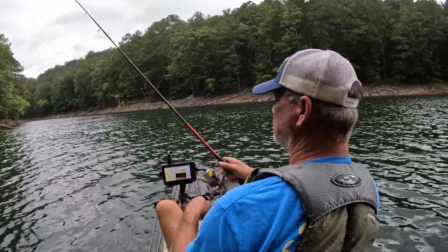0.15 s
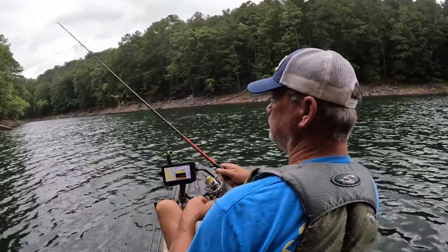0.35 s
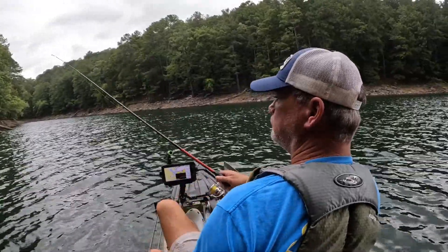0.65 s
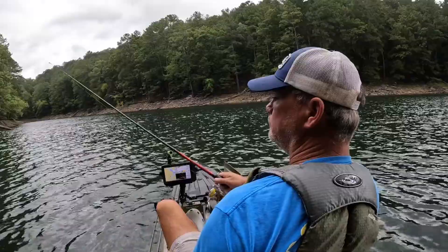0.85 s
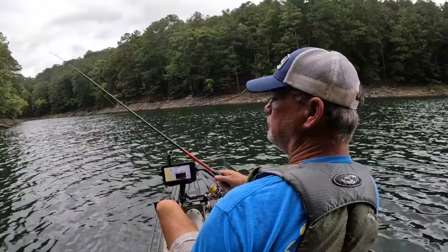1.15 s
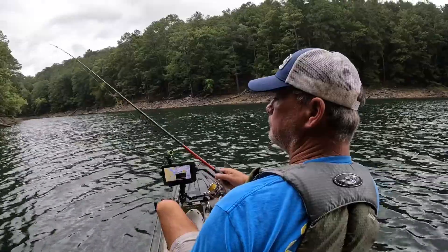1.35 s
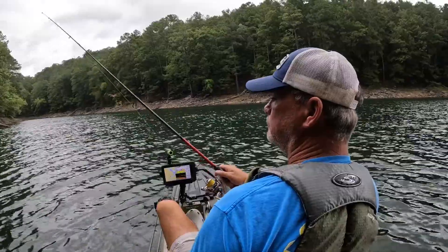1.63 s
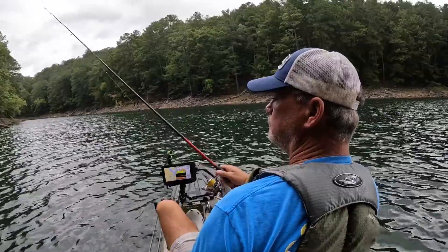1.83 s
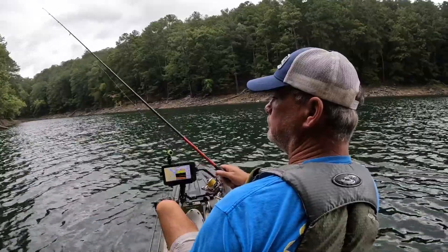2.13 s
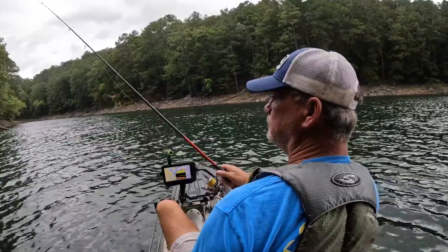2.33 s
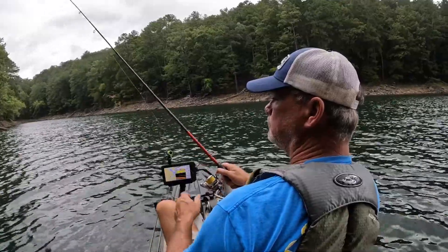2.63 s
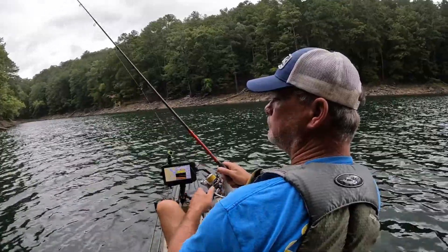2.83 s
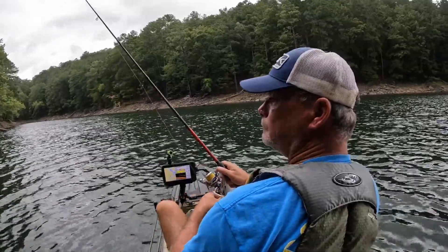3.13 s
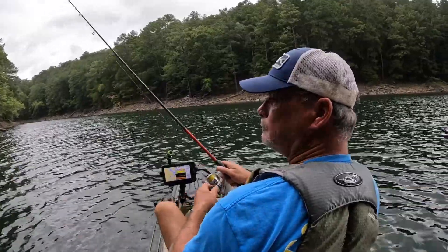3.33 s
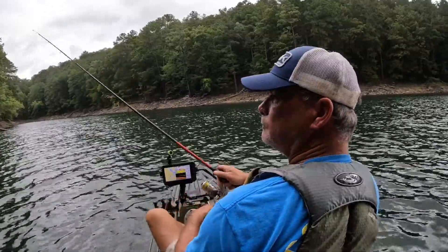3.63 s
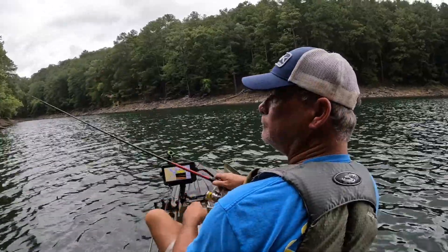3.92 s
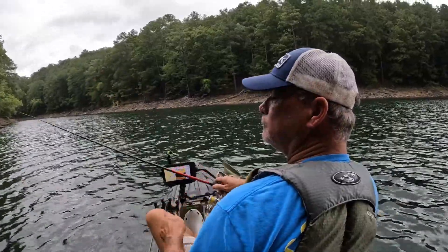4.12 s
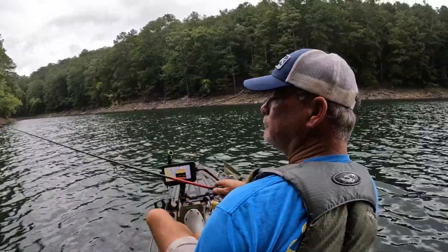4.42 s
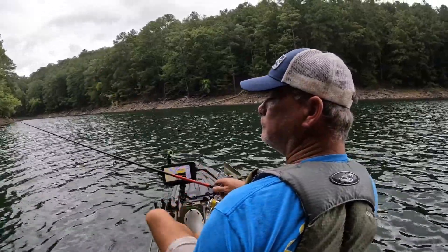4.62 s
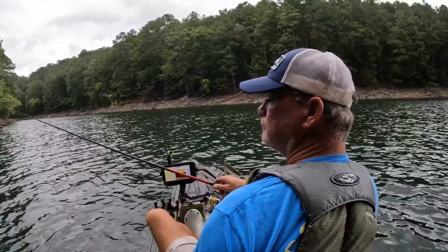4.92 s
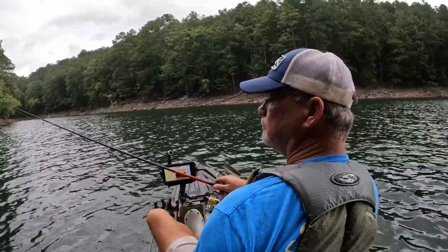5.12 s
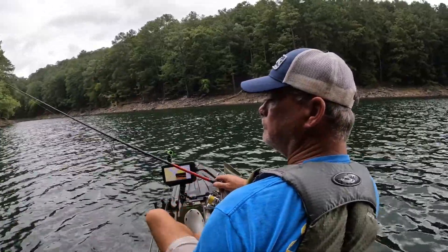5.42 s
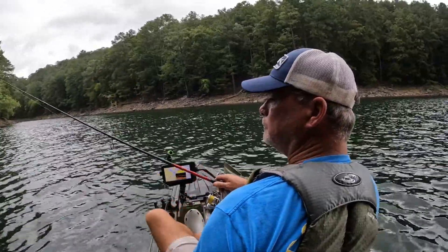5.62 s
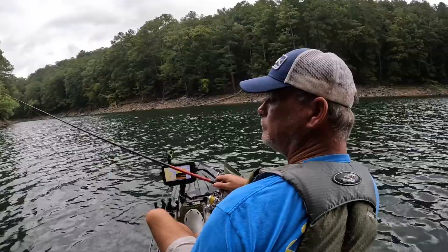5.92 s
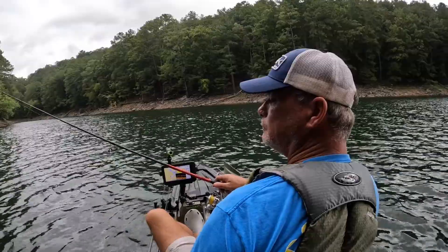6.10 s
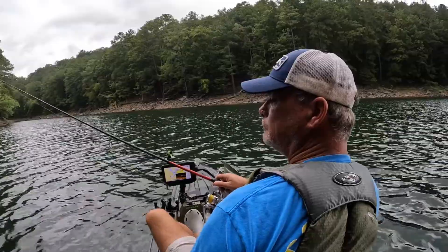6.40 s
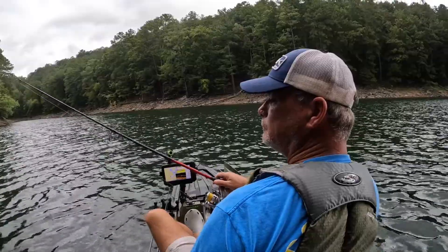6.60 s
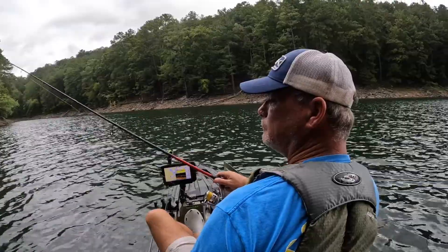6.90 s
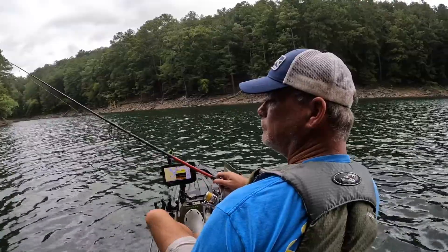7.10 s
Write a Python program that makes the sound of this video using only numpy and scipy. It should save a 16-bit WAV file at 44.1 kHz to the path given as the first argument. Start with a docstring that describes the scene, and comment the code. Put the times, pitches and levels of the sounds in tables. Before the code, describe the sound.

Low buffeting wind, soft watery wash and bubbly laps against a small boat, scattered tackle ticks and a few dull hull knocks.

```python
"""On a breezy lake, an angler sits in a small boat while gusts buffet the microphone as turbulent noise.
Ripples wash and slosh as filtered noise; bubbles plop along the hull as decaying sines of rising pitch.
The hull knocks as a sum of damped modes; rod and reel tick as resonant noise bursts.
The line squeaks as gliding sines, a sleeve rustles as noise shaped by the stroke's speed,
and the left microphone port rings in the treble."""
import sys
import numpy as np
from scipy import signal
from scipy.fft import rfft, irfft, next_fast_len
from scipy.io import wavfile
from scipy.ndimage import uniform_filter1d, map_coordinates

SR = 44100
rng = np.random.default_rng(int(sys.argv[2]) if len(sys.argv) > 2 else 0)


def persist_wave(psi):
    """Save psi, clipped to +-1, as 16-bit WAV."""
    counts = np.round(np.clip(psi, -1, 1) * 32767).astype(np.int16)
    wavfile.write(sys.argv[1], SR, np.atleast_2d(counts).T)


N = 319813  # samples

# Gusts on the microphone. Each row: start of full strength in seconds, hold in seconds,
# rumble in dB, flutter in dB, both before trims.
GUSTS = [(-0.02, .03, -24.5, -31.5), (0.195, .14, -26, -30.5), (.5, 0.073, -33.5, -33),
         (0.605, 0.3, -29, -39), (1.023, 0.17, -32.5, -44), (1.313, 0.035, -32, -48),
         (1.47, 0.057, -32.5, -50), (1.72, 0.31, -36, -57), (2.268, 0.078, -33.5, -48),
         (2.436, 0.044, -24, -39), (2.524, 0.33, -30, -44.5), (3.078, 0.32, -33, -46),
         (3.583, 0.085, -42, -48.5), (4.024, .07, -37, -61), (4.155, 0.35, -35, -48),
         (4.604, 0.14, -43.5, -48.5), (5.044, 0.17, -43.5, -61), (5.332, 0.37, -39, -44),
         (5.82, 0.051, -31.5, -46.5), (6.19, 0.5, -45.5, -53.5), (6.811, 0.14, -31, -37.5),
         (7.04, .02, -39, -32.5), (7.142, .1, -35.5, -42.5)]
# Large eddies. Each row: frequency in Hz, relative spectral level in dB.
RUMBLE_SPECTRUM = [(8, -32), (18, -2.5), (30, 5.5), (48, 0), (58, -9.5), (75, -17), (110, -59), (300, -100)]
# Smaller eddies. Each row: frequency in Hz, relative spectral level in dB.
FLUTTER_SPECTRUM = [(35, -24), (52, 0), (66, 0.5), (82, -3.5), (100, -13.5), (125, -14.5), (170, -32.5),
                    (260, -41.5), (600, -70)]
# Quick eddies of a hard gust. Each row: frequency in Hz, relative spectral level in dB.
BUFFET_SPECTRUM = [(60, -21), (110, -8), (155, -9.5), (205, -12), (280, -26.5), (500, -35), (2000, -73)]
GUST_RISE_DB_PER_S, GUST_FALL_DB_PER_S = 199, 178
LULL_RUMBLE_DB, LULL_FLUTTER_DB = -49, -67  # the breeze between gusts, before trims

# The lake's level over time. Each row: time in seconds, wash of ripples and trees in dB,
# slosh along the hull in dB, both before the gains below.
LAKE_LEVELS = [(0.06, -51.5, -61.5), (0.52, -52, -68), (0.74, -52, -61.5), (1.34, -52.5, -66),
               (2.0, -51, -69), (3.3, -52, -66), (3.78, -50.5, -65.5), (4.7, -50.5, -62),
               (5.03, -51.5, -65.5), (5.37, -50.5, -63.5), (6.81, -52, -67.5), (7.25, -53.5, -61.5)]
WASH_GAIN_DB, SLOSH_GAIN_DB = 0.95, 2.5
# Far ripples and trees. Each row: frequency in Hz, relative spectral level in dB.
WASH_SPECTRUM = [(30, 15), (70, 6.5), (140, 9.5), (205, 5.5), (260, -4.5), (440, -1.5), (700, -10),
                 (930, -5), (1060, -0.5), (1400, -1.5), (3200, -1.5), (7300, -7), (9000, -18.5),
                 (11000, -19), (14000, -33)]
# Water moving along the hull. Each row: frequency in Hz, relative spectral level in dB.
SLOSH_SPECTRUM = [(100, -25), (190, 2), (270, -2), (440, -2), (600, -5), (800, -8), (1200, -55),
                  (3000, -57)]
# Likeness of the two channels. Each row: frequency in Hz, left-right correlation (no unit).
LIKENESS = [(60, 1), (130, 0.82), (280, 0.65), (450, 0.81), (900, 0.49), (3000, 0.23), (6000, 0.53),
            (9000, 0.5), (11000, 0.92)]

# Strokes of the sleeve. Each row: time of greatest speed in seconds, half length in seconds,
# hiss in dB, scrape on the life vest in dB, both before panning.
STROKES = [(0.266, 0.21, -60, -76), (.6, 0.38, -63, -85), (3.658, 0.16, -68, -60), (3.778, 0.066, -61, -54),
           (3.95, 0.72, -60.5, -73)]
# Rubbing cloth. Each row: frequency in Hz, relative spectral level in dB.
CLOTH_SPECTRUM = [(300, -36), (1000, 1), (3000, 14.5), (6000, -8), (8800, -11), (10800, 3), (12800, -5),
                  (14500, -63)]

# Air pockets closing at the hull. Each row: start in seconds, level in dB before panning,
# pitch in Hz before its rise, left over right in dB, ring's time to fall 60 dB in seconds.
PLOPS = [(.54, -41.5, 1050, 1, 0.021), (.924, -47.5, 1100, 10, 0.13), (1.328, -46, 1310, 11, 0.025),
         (1.589, -47, 1400, 5, 0.043), (1.953, -45, 1600, 8, .035), (2.384, -47.5, 1270, 3, 0.033),
         (2.645, -47, 1570, 0, .05), (2.889, -41, 1310, 4, 0.028), (3.301, -44.5, 1460, 9, 0.05),
         (3.432, -45, 1570, 9, .04), (4.169, -39, 1080, -1, .018), (4.344, -47, 1316, 7, 0.067),
         (4.657, -44.5, 2500, 16, 0.043), (4.833, -36, 2030, 5, 0.034), (4.887, -43.5, 1200, 3, 0.021),
         (5.175, -45, 870, -8, 0.039), (5.41, -46, 1210, 8, 0.032), (5.49, -44, 2630, 1, 0.048),
         (6.304, -40, 1040, 3, 0.022), (6.818, -39.5, 860, 19.5, 0.023)]
# Fainter pockets in between: mean rate, level, median pitch and its spread, ring's time to fall 60 dB.
PLINKS_PER_S, PLINK_DB, PLINK_HZ, PLINK_OCTAVES, PLINK_T60_S = 1.5, -50, 1380, 0.28, 0.035

# Squeaks of the line in the rod guides. Each row: start in seconds, length in seconds,
# first pitch in Hz, last pitch in Hz, level in dB.
SQUEAKS = [(1.32, 0.21, 8500, 7400, -65.5), (3.387, 0.21, 10900, 12400, -73),
           (3.41, .13, 12700, 11600, -71), (6.327, .07, 10750, 8900, -66)]

# Clicks of rod and reel. Each row: time in seconds, crack's peak in dB before trim, centre in Hz,
# bright edge in dB before trim and dull body in dB (both against the crack), change per rebound in dB.
TICKS = [(1.327, -37.5, 5600, -31, -7, -15), (1.7844, -41, 6250, -6, -23.5, -12),
         (2.4502, -28, 6030, -28, -30, -25), (2.888, -36.5, 6200, -13, -10, -13),
         (3.301, -43, 6250, -1, -20, -18), (3.9415, -41, 6340, -3, -20, -10),
         (4.47, -32.5, 5100, -28, -20, -15), (4.635, -30, 7700, -2.5, -16, -4.5),
         (4.6569, -31.5, 2520, -30, -20, -15), (5.777, -34.5, 6740, -10, -24, -12),
         (5.839, -35, 6030, -10, -26, -15), (6.0925, -26.5, 4150, -19, -33, -6),
         (6.303, -30.5, 2450, -21, -7, -12), (6.411, -34.5, 2830, -19, -18, -12),
         (6.541, -34, 6330, -4.5, -18, -18), (6.769, -34, 6000, -35, -17, -18),
         (6.818, -24, 3470, -15.5, -17, 0), (6.868, -36, 6010, -9, -3, -9)]
# Resonances of rod and reel body. Each row: frequency in Hz, width in Hz, level in dB.
ROD_RESONANCES = [(880, 350, 0), (2750, 180, 1), (3660, 100, 0)]
REEL_TICKS_PER_S, REEL_TICK_DB = 1, -48  # faint stray ticks of the reel, before trim
TICK_CYCLES, REBOUND_S = 37, 0.00244  # cycles to fall 60 dB; interval between strikes

# Hollow knocks on the hull. Each row: start in seconds, level in dB.
KNOCKS = [(4.631, -33), (4.679, -40.5), (7.035, -36.5)]
# Modes of the hull. Each row: frequency in Hz, level in dB, time to fall 60 dB in seconds.
HULL_MODES = [(145, -2.5, 0.12), (200.6, -1, 0.14), (296, -1, 0.047)]

# The ports' unequal sensitivity. Each row: frequency in Hz, left over right in dB.
PORT_LEAN = [(40, -3.5), (150, -3), (450, -3), (850, -2), (1300, 2), (3000, 2.5), (5000, 2.5), (8000, 3.5),
             (10500, 0.5)]
TOP_HZ = 14200  # band limit


def amp(db):
    """The decibel is logarithmic: return the amplitude ratio."""
    return 10 ** (np.asarray(db) / 20)


def unit(x):
    """Mean-square normalisation: x at rms 1."""
    return x / np.sqrt(np.mean(x ** 2) + 1e-20)


def along(points, hz):
    """Logarithmic frequency scale: (Hz, value) points interpolated at hz."""
    f, v = np.transpose(points)
    return np.interp(np.log(hz + 1), np.log(f + 1), v)


def curves(rows):
    """Linear interpolation in time: one curve for each column after the first."""
    s, *cols = np.transpose(rows)
    return [np.interp(np.arange(N) / SR, s, c) for c in cols]


def wobble(rate):
    """Slow random modulation: a spline through normal draws, rate knots a second."""
    knots = rng.standard_normal(int(N * rate / SR) + 4)
    return map_coordinates(knots, [np.arange(N) * rate / SR])


def filtered(x, response):
    """Convolution theorem: the spectrum of x times a response of frequency."""
    n = x.shape[-1]
    m = next_fast_len(n + SR // 4)
    return irfft(rfft(x, m) * response(np.fft.rfftfreq(m, 1 / SR)), m)[..., :n]


def resonance(f, hz, width):
    """Damped oscillator: the causal response of one resonance, 1 at its centre."""
    return 1j * f * width / (hz * hz - f * f + 1j * f * width)


def add(track, s, sound):
    """Superposition: mix a sound into a track at s seconds."""
    part = track[..., max(round(s * SR), 0):][..., :sound.shape[-1]]
    part += sound[..., :part.shape[-1]]


def panned(lean_db):
    """Interchannel level difference: left and right gains, half the difference each."""
    return amp(np.array([[.5], [-.5]]) * lean_db)


def scattered(per_s):
    """Jittered spacing: random moments at a mean rate, rows (s, a, b, c) with three normal draws."""
    draws = rng.standard_normal((64, 4))
    draws[:, 0] = (np.arange(len(draws)) + .5 + draws[:, 0] / 2) / per_s
    return draws[(draws[:, 0] > 0) & (draws[:, 0] < N / SR)]


def rush(spectrum, patchy_db, alike=LIKENESS):
    """Partly coherent noise: stereo at rms 1, with random gain in patches of time and frequency."""
    z = signal.stft(rng.standard_normal((2, N)), nperseg=512)[2]
    field = uniform_filter1d(rng.standard_normal(z.shape[1:]), size=8, axis=0)
    field = uniform_filter1d(field, size=9, axis=1)
    pair = signal.istft(z * amp(patchy_db * unit(field)), nperseg=512)[1][:, :N]

    def mid_side(f):
        # the correlation sets how power divides between sum and difference
        turn = np.arccos(np.clip(along(alike, f), -1, 1)) / 2
        return amp(along(spectrum, f)) * [np.cos(turn), np.sin(turn)]

    mid, side = filtered(pair, mid_side)
    return unit(np.array([mid + side, mid - side]))


def eddies(spectrum, span):
    """Turbulent pressure: noise nearly alike on both ports, its power evened over span seconds."""
    x = rush(spectrum, patchy_db=0, alike=[(50, .975)])
    power = np.mean(np.abs(signal.hilbert(x)) ** 2, axis=0)
    local_power = np.abs(uniform_filter1d(power, max(int(span * SR), 1)))
    return unit(x / np.sqrt(local_power + 1e-6))


def gusting(peaks_db, lull_db):
    """Exponential growth and decay: each gust rises, holds and dies away into the breeze."""
    t = np.arange(N) / SR
    gusts_db = []
    for (s, hold, *_), db in zip(GUSTS, peaks_db):
        rise_db = GUST_RISE_DB_PER_S * np.maximum(s - t, 0)
        fall_db = GUST_FALL_DB_PER_S * np.maximum(t - s - hold, 0)
        gusts_db.append(db - rise_db - fall_db)
    return np.hypot(amp(np.max(gusts_db, axis=0)), amp(lull_db))


def wind():
    """Turbulence at the ports: large eddies rumble, smaller ones flutter, quick ones grow fastest in gusts."""
    _, _, rumble_db, flutter_db = np.transpose(GUSTS)
    slow = gusting(rumble_db, LULL_RUMBLE_DB)
    quick = gusting(flutter_db, LULL_FLUTTER_DB)
    lumps = amp(1.6 * wobble(22))
    rumble = amp(0.5) * slow * lumps * eddies(RUMBLE_SPECTRUM, span=0.06)
    flutter = quick * amp(3.2 * wobble(25)) * eddies(FLUTTER_SPECTRUM, span=0.039)
    hard = quick * (quick / quick.max()) ** 0.15
    buffet = amp(-18.0) * hard * eddies(BUFFET_SPECTRUM, span=.06)
    return (rumble + flutter + buffet) * panned(-1.6)


def bubble(t, hz, t60, rise, attack):
    """Volume oscillation: an air pocket rings, its pitch rising as it nears the surface."""
    pitch = hz * (1 + rise * (np.minimum(t / t60, 1) - .15))
    tone = np.sin(2 * np.pi * np.cumsum(pitch, axis=-1) / SR)
    return tone * amp(-60 * t / t60) * (1 - np.exp(-t / attack))


def bubbles(count, hz, spread, cycles, size_db):
    """Random superposition: a swarm of small bubbles at rms 1, bunched by the passing wavelets."""
    chance = amp(4 * wobble(6))
    starts = np.searchsorted(np.cumsum(chance) / chance.sum(), rng.random(count))
    pitch, life, size, side = rng.standard_normal((count, 4)).T[..., None]
    t = np.arange(SR // 25) / SR
    pitch = hz * np.exp(spread * pitch)
    t60 = cycles / pitch * np.exp(0.33 * life)
    level = amp(size_db * np.minimum(size, 1.8))
    rings = level * bubble(t, pitch, t60, rise=0.13, attack=0.00028)
    where = (starts[:, None] + np.arange(len(t))).ravel()
    channels = [np.bincount(where, (rings * amp(sign * 3.1 * side)).ravel(), N)[:N] for sign in (1, -1)]
    return unit(np.array(channels))


def lake():
    """Many incoherent sources: a far wash of water and trees, with slosh, gurgle and fizz close by."""
    wash_db, slosh_db = curves(LAKE_LEVELS)
    far = amp(-1) * rush(WASH_SPECTRUM, patchy_db=0.95)
    gurgle = amp(-16.5) * bubbles(count=420, hz=1340, spread=0.153, cycles=40, size_db=3.5)
    fizz = amp(-14) * bubbles(count=2200, hz=4013, spread=0.339, cycles=29, size_db=6)
    slosh = unit(amp(2.5 * wobble(14)) * rush(SLOSH_SPECTRUM, patchy_db=3.0))
    wash = amp(wash_db + WASH_GAIN_DB) * (far + gurgle + fizz)
    return wash + amp(slosh_db + SLOSH_GAIN_DB) * slosh


def sleeve():
    """Friction noise: cloth hisses with the arm's speed; on the vest it scrapes, lower and rougher."""
    out, t = np.zeros((2, N)), np.arange(N) / SR
    cloth = amp(2.9 * wobble(70)) * rush(CLOTH_SPECTRUM, patchy_db=2.0)
    hiss = unit(cloth) * panned(-2.5)
    rough = amp(2.9 * wobble(160)) * rng.standard_normal(N)
    scrape = unit(filtered(rough, lambda f: resonance(f, 2800, 3200) ** 2)) * panned(-6)
    for s, half, hiss_db, scrape_db in STROKES:
        speed = np.maximum(1 - ((t - s) / half) ** 2, 0)
        out += amp(hiss_db) * speed * hiss + amp(scrape_db) * speed ** 2 * scrape
    return out


def laps():
    """Bubble entrapment: each wavelet that meets the hull traps a bubble and throws a little spray."""
    out, t = np.zeros((2, N)), np.arange(SR // 6) / SR
    plinks = []
    for s, size, pitch, side in scattered(PLINKS_PER_S):
        hz = PLINK_HZ * 2 ** (PLINK_OCTAVES * pitch)
        plinks.append((s, PLINK_DB + size, hz, 5.7 + 2.5 * side, PLINK_T60_S))
    for s, db, hz, lean_db, t60 in PLOPS + plinks:
        noise = rng.standard_normal(len(t))
        spray = unit(filtered(noise, lambda f: resonance(f, hz, 0.93 * hz) ** 2))
        ring = bubble(t, hz, t60, rise=0.28, attack=0.0012)
        plop = ring + 0.27 * spray * amp(-60 * t / 0.12)
        add(out, s, amp(db) * panned(lean_db) * plop)
    return out


def line():
    """Frictional vibration: the line slides over a guide with a faint, gliding whistle."""
    out = np.zeros(N)
    for s, length, start_hz, end_hz, db in SQUEAKS:
        n = int(length * SR)
        pitch = np.linspace(start_hz, end_hz, n) * (1 + 0.0104 * wobble(845)[:n])
        whistle = np.sin(2 * np.pi * np.cumsum(pitch) / SR)
        add(out, s, amp(db) * np.hanning(n) ** .5 * whistle)
    return out


def tackle():
    """Impact and rebound: dry cracks, bright edge and dull body, coloured by the rod's resonances."""
    out, t = np.zeros((2, N)), np.arange(SR // 15) / SR
    strays = [(s, REEL_TICK_DB + 2 * size, 6100 + 400 * pitch, -5 + 2 * edge, -20, -15)
              for s, size, pitch, edge in scattered(REEL_TICKS_PER_S)]
    # time since each strike: the first contact and two rebounds
    ages = [np.maximum(t - k * REBOUND_S, 0) for k in range(3)]

    def rod(f):
        return 1 + sum(amp(db) * resonance(f, hz, width) for hz, width, db in ROD_RESONANCES)

    for s, db, hz, edge_db, body_db, rebound_db in TICKS + strays:
        contacts = sum(amp(k * rebound_db - 60 * age * hz / TICK_CYCLES) * (1 - np.exp(-age / 0.00014))
                       for k, age in enumerate(ages))

        def bands(f):
            crack = resonance(f, hz, 0.88 * hz) ** 2 / (1 + (f / 8000) ** 8)
            edge = resonance(f, 10050, 4800) ** 2
            body = resonance(f, 850, 1060) ** 2
            return np.array([crack, edge, body])

        bursts = rng.standard_normal((3, len(t))) * contacts
        parts = filtered(bursts, lambda f: bands(f) * rod(f))
        parts = parts / np.abs(parts).max(axis=1, keepdims=True)
        click = amp(db - 5.0) * amp([0, edge_db + 1.5, body_db]) @ parts
        add(out, s + .0008, panned(2.7) * click)  # begins 0.8 ms after the listed time
    return out


def hull():
    """Modal vibration: a knock rings the hollow hull briefly."""
    out, t = np.zeros(N), np.arange(SR // 4) / SR
    for s, db in KNOCKS:
        ring = sum(amp(level - 60 * t / t60) * np.sin(2 * np.pi * hz * t) for hz, level, t60 in HULL_MODES)
        add(out, s, amp(db) * ring * (1 - np.exp(-t / 0.0039)))
    return out


def scene():
    """Free field: over open water everything arrives directly, without echo."""
    return wind() + lake() + sleeve() + laps() + line() + tackle() + hull()


def record(dry):
    """Cavity resonance: two unequal ports, the left one ringing, then a sharp band limit."""
    left, right = filtered(dry, lambda f: panned(along(PORT_LEAN, f)))
    left = filtered(left, lambda f: 1 + amp(10.5) * resonance(f, 6190, 1040))
    return filtered(np.array([left, right]), lambda f: f < TOP_HZ)


dry = scene()
out = record(dry)
persist_wave(out)
```